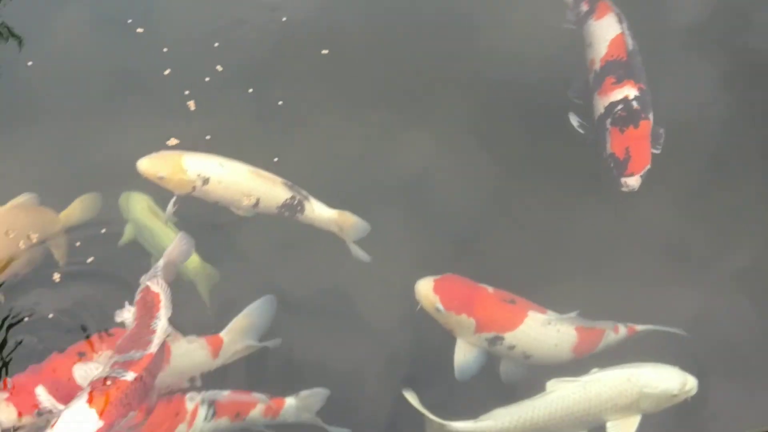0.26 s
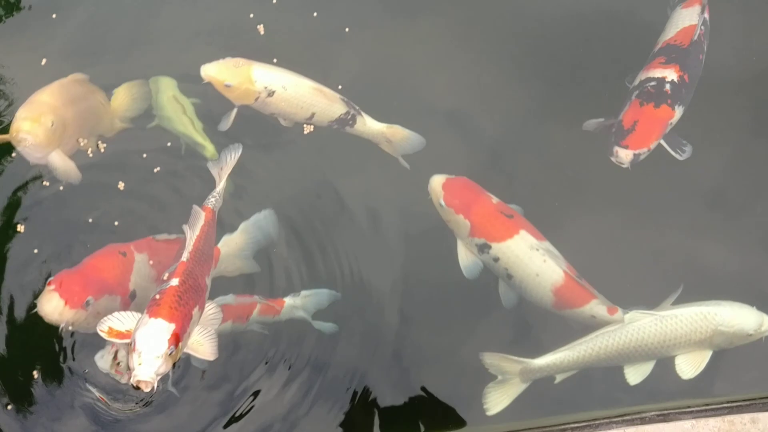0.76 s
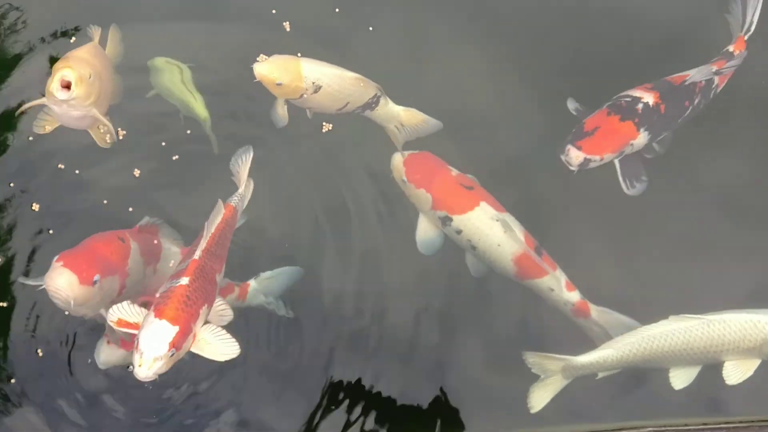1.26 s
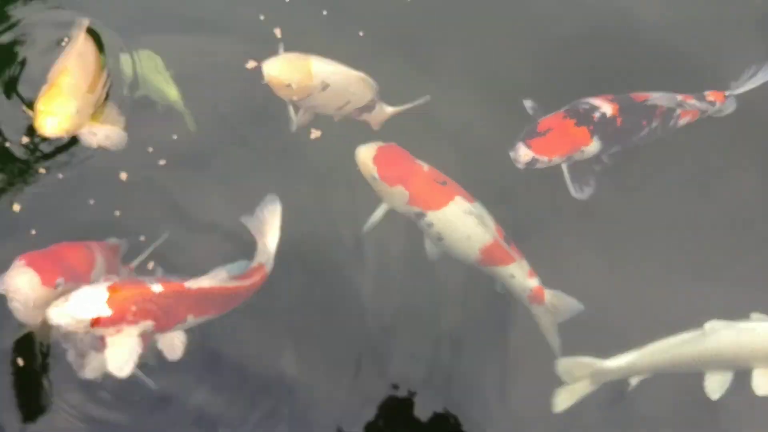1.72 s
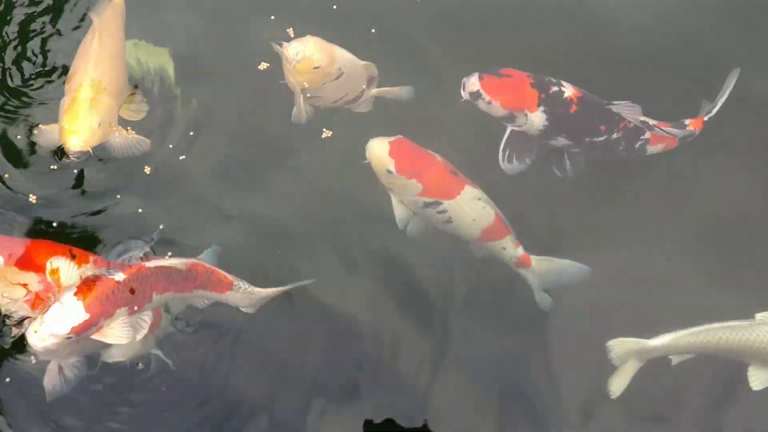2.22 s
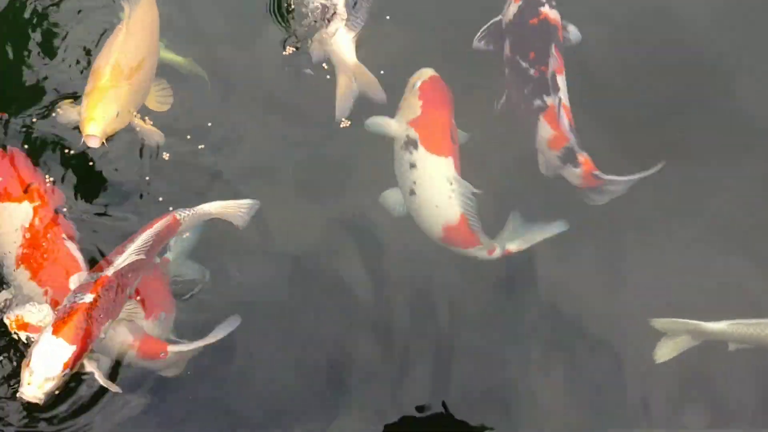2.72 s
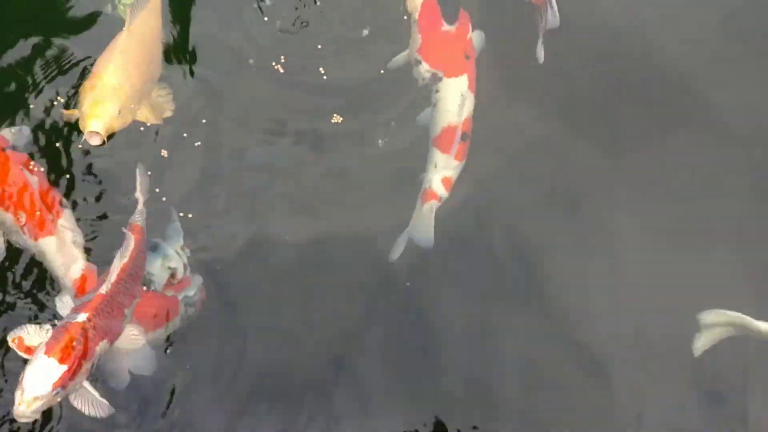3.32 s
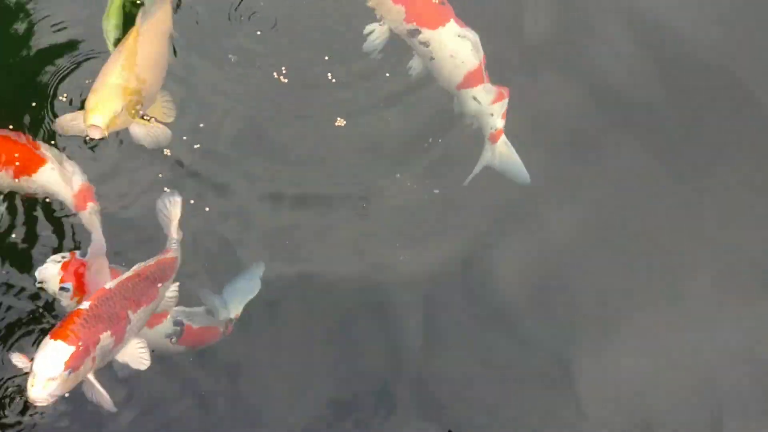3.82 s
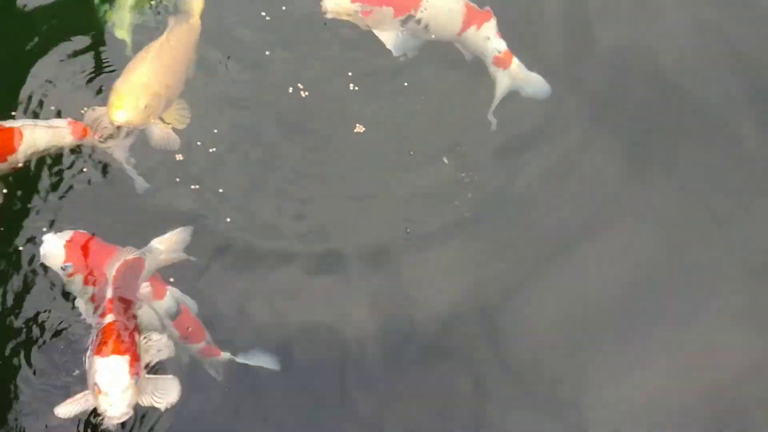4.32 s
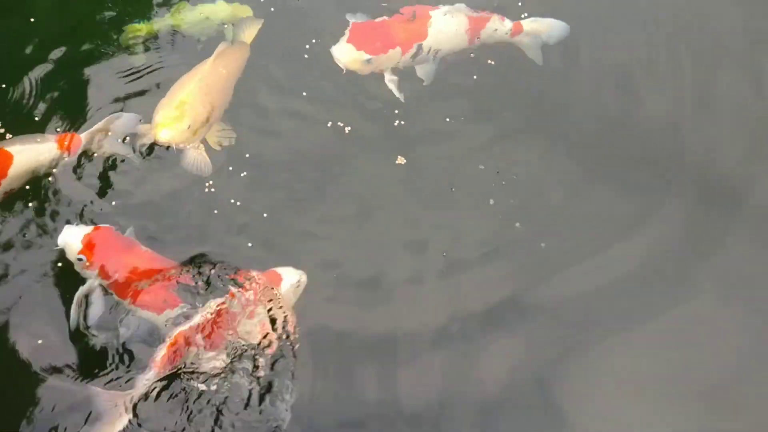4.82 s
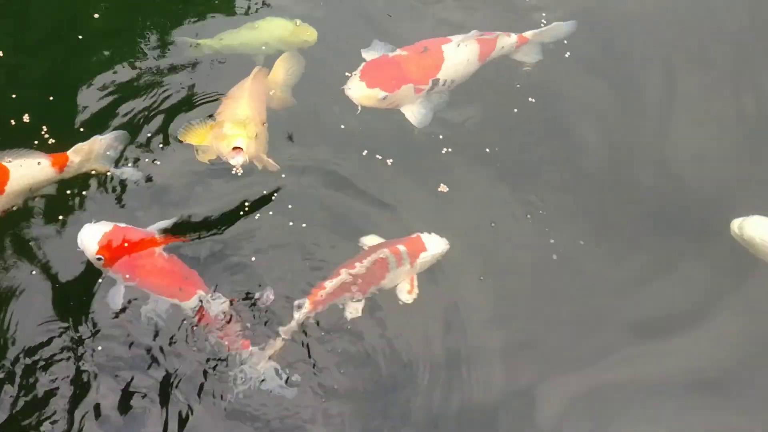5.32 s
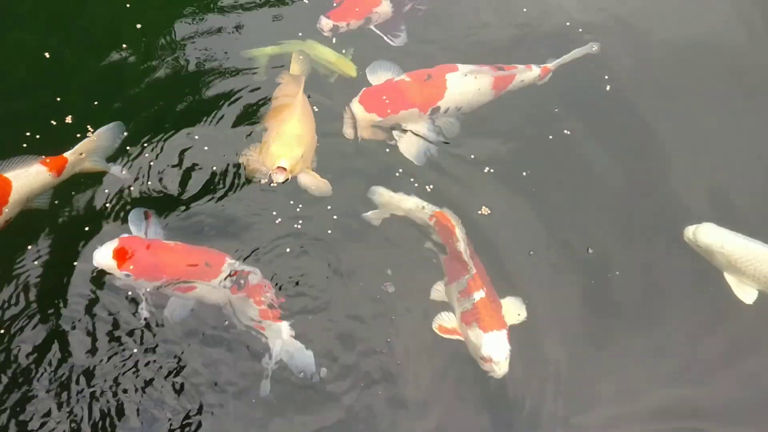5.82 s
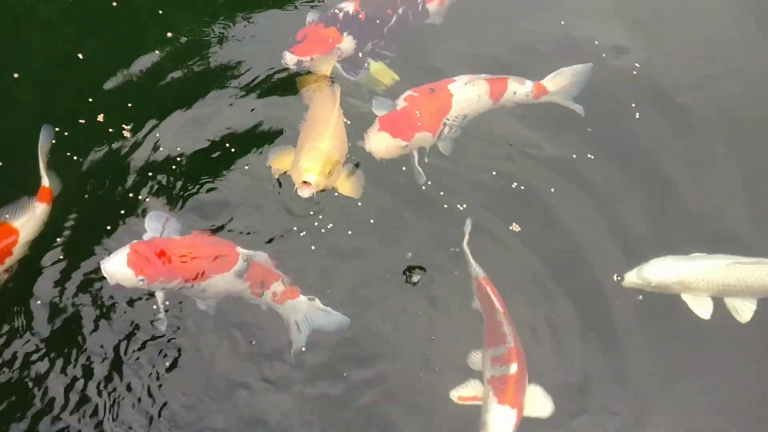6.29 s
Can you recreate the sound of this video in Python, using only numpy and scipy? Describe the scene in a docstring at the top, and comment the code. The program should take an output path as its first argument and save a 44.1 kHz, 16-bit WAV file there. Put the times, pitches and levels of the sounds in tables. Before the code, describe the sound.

At the edge of a garden pond, falling water hisses and trickles steadily. Low wind thumps buffet the phone microphone, mostly on the right. From about two seconds, koi make small wet plops and gulps, then a sharp cluster of snapping smacks near 2.4 seconds. Sparser gulps follow, with a clear pop near 5.5 seconds. Faint finger knocks touch the case.

```python
"""Garden pond, heard at its edge through the left and right microphone ports of a phone.
Koi feed: mouths suck air in rising sine gulps, decaying sine bubbles plop, films of water snap,
and lips and fins smack up noise spray; echoes and a short tail follow.
Falling water is coloured noise plus many small bubbles. Wind is noise and chirped thumps at each port.
Fingers knock and rub the case; faint ticks of high noise sit on top."""
import sys
import numpy as np
from scipy import signal
from scipy.fft import rfft, irfft, next_fast_len
from scipy.io import wavfile
from scipy.ndimage import uniform_filter1d

SR = 44100
rng = np.random.default_rng(int(sys.argv[2]) if len(sys.argv) > 2 else 0)


def generate_wav(sig):
    """Save sig (samples, or channels by samples) to the path in sys.argv[1] as 16-bit PCM at SR."""
    pcm = np.round(np.clip(np.atleast_2d(sig).T, -1, 1) * 32767).astype(np.int16)
    wavfile.write(sys.argv[1], SR, pcm)


N = 288964
TIME = np.arange(N) / SR


def undb(db):
    """Decibels to gain."""
    return 10 ** (np.asarray(db) / 20)


def unit(x):
    """Scale to rms 1."""
    return x / np.sqrt(np.mean(x ** 2))


def colour(x, points):
    """Filter by (Hz, dB) points, interpolated over log frequency."""
    size = next_fast_len(len(x) + 2048)
    point_hz, point_db = np.transpose(points)
    bin_hz = np.maximum(np.arange(size // 2 + 1) * SR / size, 1)
    gain = undb(np.interp(np.log(bin_hz), np.log(point_hz), point_db))
    return irfft(rfft(x, size) * gain, size)[:len(x)]


def noise(points):
    """Coloured noise of rms 1."""
    return unit(colour(rng.standard_normal(N), points))


def walk(rate_hz):
    """Random modulator of rms 1: a new level each 1 / rate_hz, joined by ramps."""
    step = int(SR / rate_hz)
    levels = np.repeat(rng.standard_normal(N // step + 1), step)
    return unit(uniform_filter1d(levels, step)[:N])


def span(seconds):
    """Time axis of a short sound."""
    return np.arange(int(seconds * SR) + 2) / SR


def fade(t, t60):
    """Exponential decay, 60 dB down after t60 seconds."""
    return np.exp(-np.log(1000) * t / t60)


def add(track, start_s, sound):
    """Mix a sound into a track, cropping at both ends."""
    sound = sound[max(-int(start_s * SR), 0):]
    i = int(np.clip(start_s * SR, 0, N - 1))
    track[i:i + len(sound)] += sound[:N - i]


def late(x, samples):
    """Delay by a number of samples."""
    return np.pad(x, (samples, 0))[:N]


def bubble(hz, t60, rise=0.18, onset_s=0.0016):
    """A bubble rings and climbs in pitch as it nears the surface."""
    t = span(t60)
    phase = 2 * np.pi * np.cumsum(hz * (1 + rise * t / t60)) / SR
    return np.sin(phase) * fade(t, t60) * (1 - np.exp(-t / onset_s)) * 2.55


def gulps(bend=0.82, wobble=0.18, waver=0.006):
    """The air pocket in a mouth shrinks, so its note slides up until it closes."""
    # Air sucked into a mouth. Each row: start in seconds, start pitch in Hz, end pitch in Hz,
    # length in seconds, level in dB, swell time constant in seconds.
    gulp_rows = [(2.047, 1800, 2430, 0.011, -33, .002), (2.055, 940, 1400, 0.014, -33.5, 0.00085),
                 (2.167, 600, 1660, 0.057, -35.5, 0.035), (2.539, 436, 720, 0.024, -45.5, 0.0086),
                 (2.565, 787, 1417, 0.039, -24.5, 0.00065), (2.603, 1330, 1520, 0.02, -46, .003),
                 (2.835, 530, 965, 0.0056, -38.5, 0.00036), (3.07, 594, 1837, 0.057, -36, 0.03),
                 (4.269, 427, 1450, 0.06, -46, 0.035), (4.433, 405, 1110, 0.059, -28.5, 0.02),
                 (4.454, 1780, 2950, 0.0066, -22.5, .003), (5.4502, 1360, 1380, 0.0088, -12.5, 0.0021)]
    out, flutter = np.zeros(N), walk(230)
    for start_s, start_hz, end_hz, length_s, db, swell_s in gulp_rows:
        t = span(length_s)
        closed = t / t[-1]
        hz = start_hz + (end_hz - start_hz) * closed ** bend
        hz = hz * (1 + waver * np.interp(start_s + t, TIME, flutter))
        envelope = (1 - np.exp(-t / swell_s)) * (1 - closed ** 2)
        add(out, start_s, undb(db) * envelope * np.sin(2 * np.pi * np.cumsum(hz) / SR))
    return out * (1 + wobble * flutter)


def plops(snap_db=-14, snap_t60=0.019):
    """Single bubbles left by mouths and fins; the small ones snap as their neck breaks."""
    # Bubbles pinching off. Each row: start in seconds, starting pitch in Hz, level in dB, t60 in seconds.
    plop_rows = [(1.970, 3590, -31.5, 0.031), (1.968, 2190, -30, .016), (2.003, 1620, -32, 0.013),
                 (2.01, 1010, -33, 0.015), (2.02, 3390, -17.5, 0.0085), (2.027, 1420, -29.5, 0.012),
                 (2.362, 2400, -32, 0.011), (2.3945, 2250, -19, 0.0087), (2.397, 3660, -28, 0.012),
                 (2.4316, 2390, -7, 0.004), (2.439, 2200, -4, 0.0035), (2.444, 2340, -14, 0.0098),
                 (2.491, 268, -37.5, 0.052), (2.496, 558, -35.5, 0.013), (2.506, 370, -41.5, 0.02),
                 (2.519, 330, -38, 0.026), (2.834, 314, -41.5, 0.02), (3.138, 2220, -24, 0.0091),
                 (3.183, 4520, -23, 0.0069), (3.764, 3270, -24.5, 0.0059), (4.244, 512, -32, 0.015),
                 (4.432, 1245, -37, 0.051), (4.439, 2460, -28, 0.015), (4.522, 1224, -35.5, 0.027),
                 (4.533, 2120, -22, 0.021), (5.46, 1370, -29, 0.046), (5.4795, 1395, -30, 0.028),
                 (5.485, 1610, -27, 0.013), (5.575, 2380, -24, 0.012), (5.887, 1660, -36.5, 0.047),
                 (6.405, 636, -49, 0.097), (6.409, 880, -47, .03)]
    out, force = np.zeros(N), np.zeros(N)
    for start_s, hz, db, t60 in plop_rows:
        add(out, start_s, undb(db) * bubble(hz, t60))
        smallness = min(hz / 3000, 1) ** 3
        add(force, start_s, undb(db + snap_db) * smallness * fade(span(snap_t60), snap_t60))
    return out + spray(force)


def smacks(bubbles_db=-5, low_hz=1600, high_hz=4000, cycles=20, count=4):
    """A slap bursts into a short spray and traps a few tiny bubbles."""
    # Lips and fins slapping the surface. Each row: start in seconds, level in dB, t60 in seconds.
    smack_rows = [(1.971, -40, 0.065), (2.021, -32, 0.014), (2.36, -41, 0.3), (2.394, -33, 0.024),
                  (2.401, -33, 0.15), (2.4423, -24, .016), (2.448, -22.5, .035), (2.455, -23, .016),
                  (3.132, -37.5, 0.035), (4.158, -36, 0.043), (4.431, -33.5, 0.027), (4.662, -38, 0.1)]
    force, fizz = np.zeros(N), np.zeros(N)
    for start_s, db, t60 in smack_rows:
        t = span(t60)
        add(force, start_s, undb(db) * fade(t, t60) * (1 - np.exp(-t / 0.000071)))
        for when, size in rng.random((count, 2)):
            hz = low_hz * (high_hz / low_hz) ** size
            level = undb(db + bubbles_db - 2.1 * when)
            add(fizz, start_s + when * t60 / 3, level * bubble(hz, cycles / hz))
    return spray(force) + fizz


def spray(force):
    """Gritty noise of torn water, as loud as the force that tears it."""
    # Spectrum of torn water. Each row: frequency in Hz, relative level in dB.
    spray_colour = [(80, -7), (250, 12.5), (500, -17), (1200, 7.5), (2300, 8), (3300, 12), (4800, 1.5),
                    (6500, -9.5), (8600, -20), (12000, -14), (15500, -9)]
    grains = unit(rng.standard_normal(N) * undb(4 * walk(1500)))
    return colour(force * grains, spray_colour) / np.std(colour(rng.standard_normal(N), spray_colour))


def snaps():
    """Each film breaking is one sharp, wet click."""
    # Films of water snapping between the lips. Each row: click centre in seconds, peak in dB.
    snap_rows = [(2.0211, -25), (2.031, -19.5), (2.4018, -22), (2.4328, -22), (2.443, -11), (2.4465, -12),
                 (2.449, -15), (2.4579, -15.5), (3.185, -40)]
    # Spectrum of a snap. Each row: frequency in Hz, relative level in dB.
    snap_colour = [(200, -4), (600, -7.5), (1300, -7), (2400, 6), (3400, -16), (4800, -11), (6500, -25),
                   (9000, -41), (14000, -29)]
    click = colour(signal.unit_impulse(200, "mid"), snap_colour)
    out = np.zeros(N)
    for centre_s, db in snap_rows:
        add(out, centre_s - len(click) / 2 / SR, undb(db) * click / click.max())
    return out


def garden(x, tail_db=-15, tail_t60=0.11):
    """A few distinct echoes and a short diffuse tail."""
    # Echoes from the pond's edge and a wall. Each row: delay in seconds, gain in dB.
    echo_rows = [(0.0123, -14), (0.0256, -20), (.031, -28)]
    t = span(tail_t60)
    response = rng.standard_normal(len(t)) * fade(t, tail_t60) * (1 - np.exp(-t / 0.0051))
    response *= undb(tail_db) / np.linalg.norm(response)
    echoes = sum(undb(db) * late(x, int(delay_s * SR)) for delay_s, db in echo_rows)
    return x + echoes + signal.fftconvolve(x, response)[:N]


def wind(left_db=1.0, right_db=-0.06):
    """Each port has its own turbulence and its own hard eddies."""
    # The hardest eddies, listed under "left" and "right" port.
    # Each row: centre in seconds, nominal peak in dB, pitch in Hz.
    hard_eddies = { "left": [(.016, -19, 124), (.816, -29, 103), (1.02, -28, 126), (1.426, -18, 105),
                   (1.498, -19, 178), (1.558, -20.5, 136), (1.596, -23, 77), (2.001, -24, 160.8),
                   (3.428, -26, 120), (3.9, -24, 118)], "right": [(.015, -15.5, 126), (.064, -12.5, 146),
                   (.087, -15, 132), (.13, -17.5, 113), (.215, -23, 96), (.728, -12.5, 81), (.793, -26, 93),
                   (.908, -17, 126), (.946, -21, 115), (.985, -19.5, 72), (1.307, -20.5, 89),
                   (1.397, -19, 107), (1.476, -22, 100), (1.515, -18, 86), (1.555, -21, 101),
                   (1.638, -18.5, 91), (1.662, -19, 110), (1.721, -19.5, 106), (1.802, -18, 97),
                   (1.864, -22.5, 90), (1.945, -19.5, 78.6), (2.6, -17.5, 116), (3.253, -22.5, 114),
                   (3.316, -22.5, 82), (3.383, -17.5, 77.4), (3.422, -18.5, 122), (3.555, -20.5, 113),
                   (3.601, -15.5, 92), (3.647, -9.5, 153), (3.658, -9, 90), (3.704, -9, 141),
                   (3.715, -9.5, 67), (3.747, -16, 127), (3.78, -22, 123), (3.92, -18, 92),
                   (4.743, -15, 98), (5.12, -17.5, 173), (5.246, -11, 127), (5.26, -17.5, 183),
                   (5.287, -25, 90), (5.466, -20.5, 91), (5.58, -20, 94), (5.604, -20, 103),
                   (5.68, -16, 117), (5.726, -18, 102), (6.009, -18.5, 126), (6.126, -15, 113),
                   (6.185, -18.5, 95.5), (6.36, -21.5, 88), (6.413, -19.5, 84), (6.44, -30, 90)]}
    left, right = airflow()
    return np.array([port_wind(left + left_db) + buffets(hard_eddies["left"]),
                     port_wind(right + right_db) + buffets(hard_eddies["right"])])


def airflow(attack_s=0.015, t60=0.11):
    """Level of the air at each port in dB: gusts rise, hold and die away over the breeze."""
    # Light breeze between gusts. Each row: time in seconds, left and right level in dB before port trim.
    breeze = [(0.0, -45, -29), (.4, -43, -44.5), (.6, -52, -57), (1.2, -41, -43), (1.9, -41.5, -33.5),
              (2.3, -61, -64), (3.1, -52, -67), (3.9, -43, -47), (4.5, -49.5, -43), (5.05, -50, -40),
              (5.35, -50, -32.5), (5.95, -37.5, -34.5), (6.55, -44, -33)]
    # Gusts. Each row: start in seconds, length in seconds, left and right level in dB before port trim.
    gusts = [(0, 0.1, -35, -23), (0.202, .075, -51, -34), (0.686, 0.077, -43, -25.5),
             (0.754, 0.11, -40, -29), (0.9, 0.091, -41, -27.5), (1.008, 0.14, -36, -52),
             (1.252, 0.091, -35.5, -28.5), (1.376, 0.2, -33.5, -33), (1.613, 0.056, -40, -26.5),
             (1.688, 0.047, -40, -28), (1.773, 0.083, -43, -33), (1.902, 0.082, -55, -32.5),
             (1.971, 0.091, -46, -32.5), (2.57, 0.064, -59, -31), (2.66, 0.032, -40, -34),
             (3.204, 0.16, -44, -31), (3.345, 0.14, -49, -29.5), (3.53, 0.096, -50, -27),
             (3.624, 0.18, -38, -26), (3.852, 0.09, -40, -39.5), (4.12, 0.059, -54, -37),
             (4.708, 0.058, -39, -28), (5.103, 0.021, -45, -26), (5.209, 0.096, -47, -25),
             (5.446, 0.044, -36, -26.5), (5.662, 0.049, -52, -29.5), (5.82, 0.086, -40, -31),
             (6.097, 0.042, -46, -26), (6.155, 0.058, -50, -27), (6.384, 0.078, -39, -25.5)]
    times, *ports = np.transpose(breeze)
    power = undb([np.interp(TIME, times, db) for db in ports]) ** 2
    for start_s, length_s, left_db, right_db in gusts:
        attack = np.clip((TIME - start_s) / attack_s, 0, 1)
        shape = attack * fade(np.maximum(TIME - start_s - length_s, 0), t60)
        power = power + (undb([[left_db], [right_db]]) * shape) ** 2
    return 10 * np.log10(power)


def port_wind(db, ref_db=-28, brighten=0.5, flicker_db=7.5, surge_db=2, surge_hz=24):
    """Turbulence at one port: a stronger flow sheds smaller, faster eddies."""
    # Spectrum of turbulence at a port. Each row: frequency in Hz, relative level in dB.
    eddy_colour = [(20, -45), (40, -3.5), (70, 4), (110, -2), (180, -10.5), (280, -25), (420, -49.5),
                   (700, -46), (1500, -54), (4000, -77), (8000, -92)]
    flow = noise(eddy_colour)
    # even out the noise's own swells, then add chosen ones
    flow = flow / np.sqrt(uniform_filter1d(uniform_filter1d(flow ** 2, size=1500), size=1000))
    flow = unit(flow * undb(surge_db * walk(surge_hz)))
    fine = colour(flow, [(120, -55), (200, -11.0), (300, -4.5)])
    fine_gain = undb(brighten * (db - ref_db) + flicker_db * walk(45))
    return undb(db) * (flow - fine + fine * fine_gain)


def buffets(rows, wake_db=-30.5, wake_t60=0.11, rasp_db=-35, rasp_speed=0.0042):
    """Hard eddies thump one diaphragm and leave a ragged wake; the fastest pushes rasp on the port's edge."""
    # Spectrum of small eddies in a wake. Each row: frequency in Hz, relative level in dB.
    wake_colour = [(100, -13), (180, 7), (290, -8), (400, -9.5), (600, -10), (1000, -45), (2000, -41)]
    eddies, wake, t = np.zeros(N), np.zeros(N), span(wake_t60)
    for centre_s, peak_db, hz in rows:
        add(eddies, centre_s - 3 / hz, eddy(hz, undb(peak_db)))
        envelope = (1 - np.exp(-t * hz)) * fade(t, wake_t60) * 2
        add(wake, centre_s - 1 / hz, undb(peak_db + wake_db) * envelope)
    speed = uniform_filter1d(np.abs(np.gradient(eddies)), size=200) / rasp_speed
    rasp = noise([(200, 12), (450, 19), (850, 12.5), (1400, -6.5),
                  (6500, -8.5), (9000, -34), (12500, -10.5), (15000, -24)])
    return eddies + wake * noise(wake_colour) + undb(rasp_db) * rasp * speed ** 3


def eddy(hz, size, width=1.63, steepen=3.04):
    """An eddy rocks the diaphragm; the harder, the steeper the front at its centre, three periods in."""
    phase = 2 * np.pi * (hz * span(6 / hz) - 3)
    return -size * np.sin(phase + steepen * size * np.tanh(phase)) / np.cosh(phase / width)


def fingers(right_db=-12, rub_db=1, scuff_db=-9):
    """Dull knocks and brief rubs travel through the case, mostly to the left port."""
    # Finger knocks on the case. Each row: start in seconds, level in dB, pitch in Hz, t60 in seconds.
    knock_rows = [(1.424, -35, 503, 0.0094), (1.498, -26.5, 375, 0.01), (1.683, -28.5, 644, 0.015),
                  (2, -35, 720, 0.0078), (4.222, -28.5, 250, 0.037), (5.022, -34, 726, 0.015),
                  (6.081, -34.5, 667, 0.025), (6.204, -37, 690, 0.027)]
    # Skin sliding over the case. Each row: start in seconds, length in seconds, level in dB before rub_db.
    rub_rows = [(1.597, 0.05, -47), (1.655, 0.11, -57), (4.585, 0.17, -51)]
    out, pressure = np.zeros(N), np.zeros(N)
    for start_s, db, hz, t60 in knock_rows:
        t = span(t60)
        add(out, start_s, undb(db) * np.sin(2 * np.pi * hz * t) * fade(t, t60))
        add(pressure, start_s, undb(db + scuff_db) * min(hz / 1200, 1) * fade(t, t60))
    for start_s, length_s, db in rub_rows:
        add(pressure, start_s, undb(db + rub_db) * signal.windows.tukey(len(span(length_s))))
    stick_slip = undb(3 * walk(300))
    out += pressure * stick_slip * noise([(200, 4), (700, 22.0), (3200, 15.0), (5000, 1), (8000, -8)])
    return np.array([out, undb(right_db) * out])


def ticks(attack_s=0.00054, left_db=-7):
    """Thin, short ticks of noise at the top of the treble, stronger on the right."""
    # Faint, very high ticks. Each row: start in seconds, level in dB, t60 in seconds.
    tick_rows = [(.837, -45, .03), (1.683, -46, .02), (1.69, -43, .02), (1.97, -42, .04), (2.023, -43, .04),
                 (2.428, -18, .004), (2.431, -35, .025), (2.444, -37, 0.037), (2.9, -43.5, .035)]
    # Spectrum of a tick. Each row: frequency in Hz, relative level in dB.
    tick_colour = [(3000, -25), (8500, -16), (13000, -1), (15500, -3)]
    force = np.zeros(N)
    for start_s, db, t60 in tick_rows:
        t = span(t60)
        add(force, start_s, undb(db) * (1 - np.exp(-t / attack_s)) * fade(t, t60))
    return force * np.array([undb(left_db) * noise(tick_colour), noise(tick_colour)])


def trickle(count=2200, low_hz=1600, high_hz=4700, level_db=-38, spread_db=1.8, clump_db=1.6):
    """Countless small bubbles, in clumps, where the falling water lands."""
    out = np.zeros(N)
    for when, size, chance, ring in rng.random((count, 4)):
        hz = low_hz * (high_hz / low_hz) ** size
        loud, cycles = min(-np.log(1 - chance), 3), 10 + 24 * ring
        # big bubbles ring longer but more softly, so all sizes carry the same energy
        level = undb(level_db + spread_db * loud) * np.sqrt(hz / high_hz)
        add(out, when * N / SR, level * bubble(hz, cycles / hz))
    return out * undb(clump_db * walk(12))


def ambience(level_db=-40.5):
    """The even hiss of falling water and the rumble below it; only the low mids are alike at both ports."""
    # Distant water over a low outdoor rumble.
    # Each row: frequency in Hz, relative level at the right port in dB, left minus right in dB.
    spectrum = [(25.3, -62, -11), (58, -57.5, 0), (143, -69, 6), (252, -76.5, 0), (398, -91, 0),
                (623, -81.5, -1.5), (1090, -81.5, -2), (1570, -77, -15), (2310, -79.5, -5.5),
                (4040, -80, -24), (4930, -85, -18), (6620, -101.7, -8.5), (8060, -110.2, -4),
                (13600, -99.3, -4)]
    hz, db, shade_db = np.transpose(spectrum)
    shared, own = rng.standard_normal((2, N))
    alike = colour(shared, [(50, -8.5), (600, -4.5), (1400, -26.0), (5000, -43.5)])
    apart = colour(own, [(50, -10), (600, -5.0), (1400, -5.5), (5000, 0.5)])
    left = colour(alike + apart, np.c_[hz, db + shade_db])
    right = colour(shared, np.c_[hz, db])
    return np.array([left, right]) / np.std(right) * undb(level_db)


def shimmer(x):
    """Each band of the falling water swells and ebbs on its own."""
    for hz in 1300 * 1.5 ** np.arange(4):
        band = colour(x, [(hz / 1.6, -30), (hz / 1.15, 0), (hz * 1.15, 0), (hz * 1.6, -30)])
        x = x + band * (undb(.7 * walk(7) + .7 * walk(50)) - 1)
    return x


def scene(lag_samples=10):
    """The pond as both ports hear it, later at the right, with the air and the hand around the phone."""
    # Liveliness of the distant water. Each row: time in seconds, gain in dB.
    flow_rows = [(0.0, 0.7), (2.0, 1), (3.5, 0), (4.1, 1.6), (4.9, 1.3), (6.55, 1)]
    # The phone's body shades the left port from the pond. Each row: frequency in Hz, gain in dB.
    shade = [(200, -4.5), (600, -2.5), (900, -4), (1400, -18), (2300, -15), (4200, -15), (6500, -18),
             (9000, -12), (15000, -9)]
    flow = undb(np.interp(TIME, *np.transpose(flow_rows)))
    pond = garden(gulps() + plops() + smacks() + snaps() + flow * trickle())
    shaded, facing = flow * ambience()
    left = colour(pond, shade) + shaded
    right = late(pond, lag_samples) + shimmer(facing)
    return np.array([left, right]) + wind() + fingers() + ticks()


def record(dry, low_hz=35, top_hz=15900):
    """The phone drops the deepest rumble and cuts the top."""
    dry = signal.sosfiltfilt(signal.butter(4, low_hz, "high", fs=SR, output="sos"), dry)
    return signal.sosfilt(signal.ellip(12, .2, 80, top_hz, fs=SR, output="sos"), dry)


dry = scene()
out = record(dry)
generate_wav(out)
```